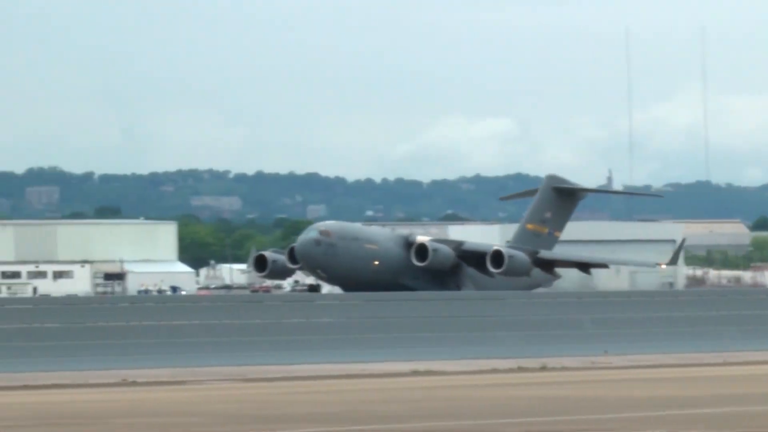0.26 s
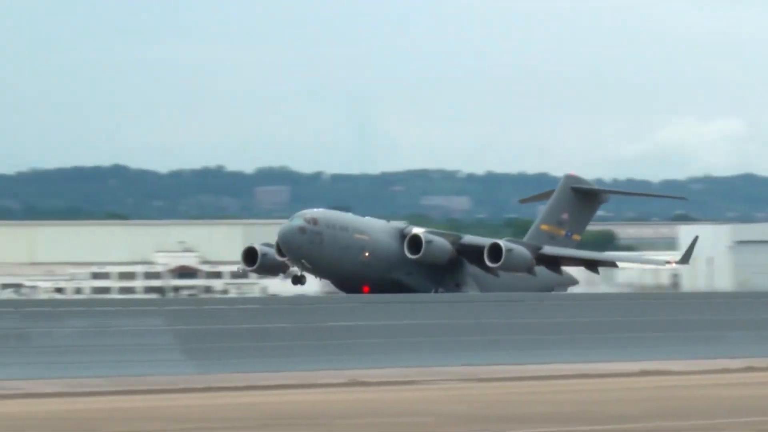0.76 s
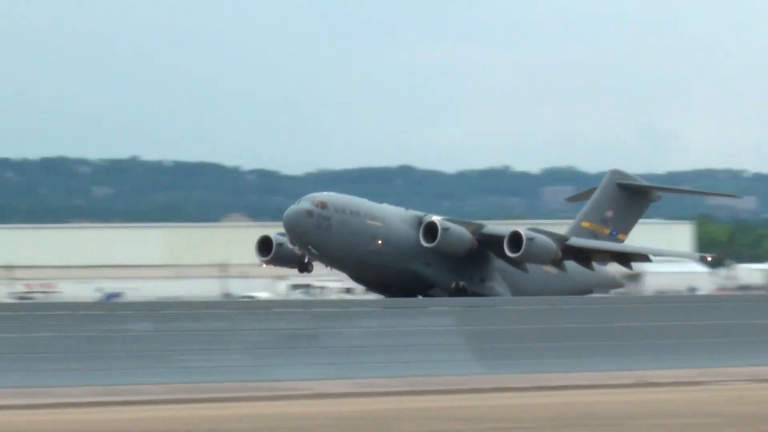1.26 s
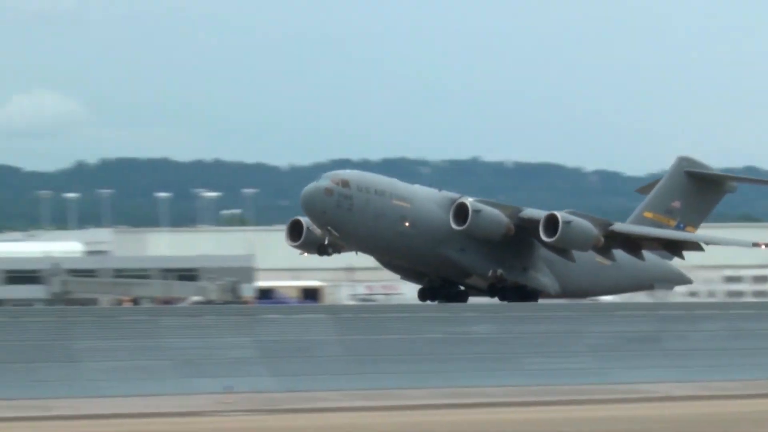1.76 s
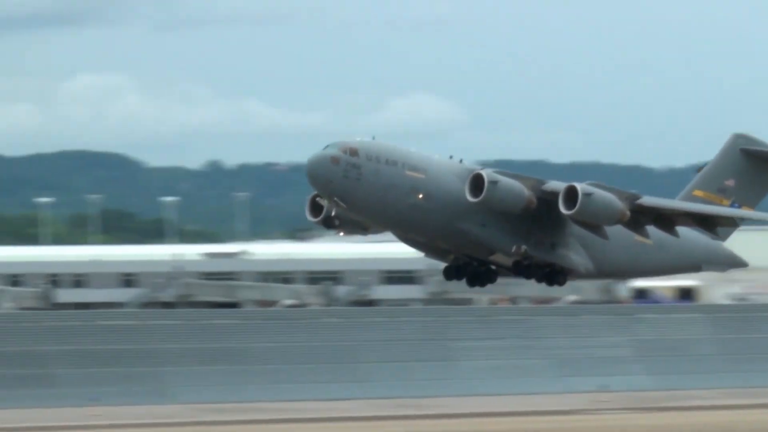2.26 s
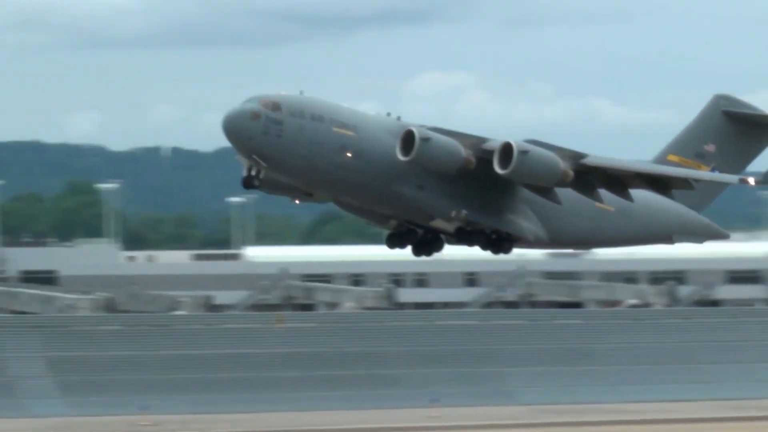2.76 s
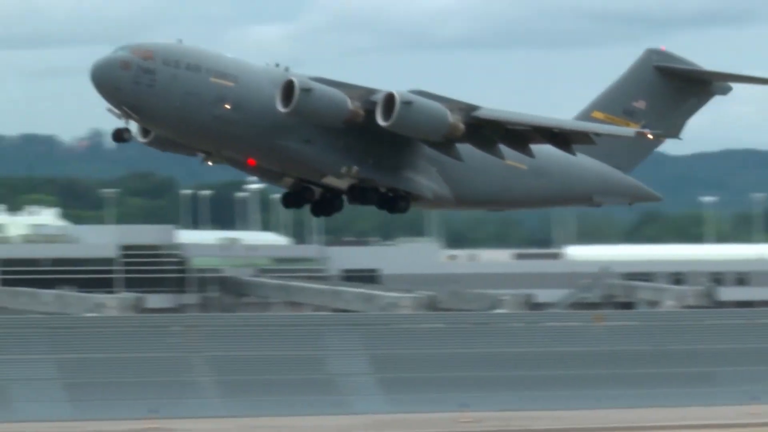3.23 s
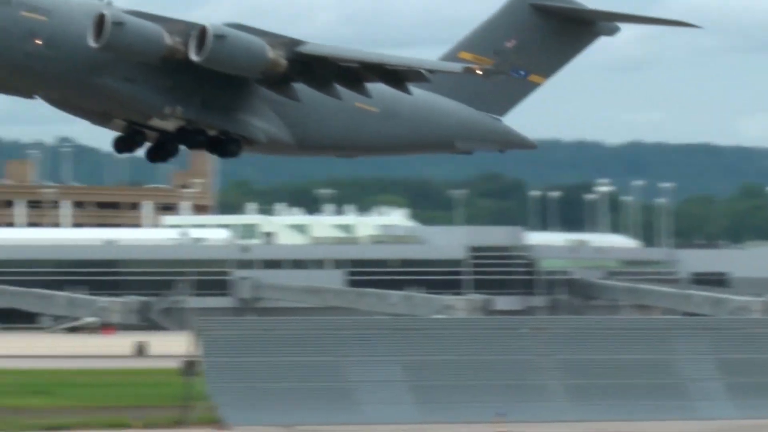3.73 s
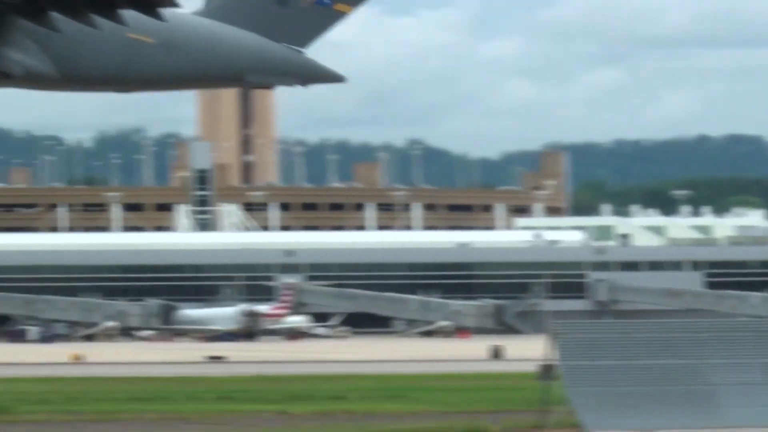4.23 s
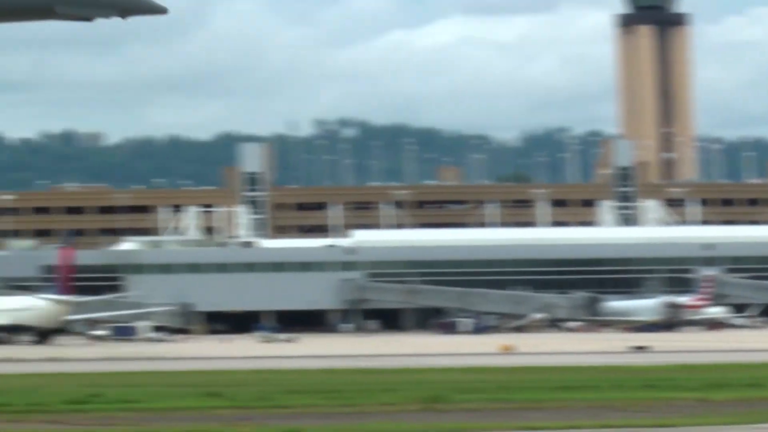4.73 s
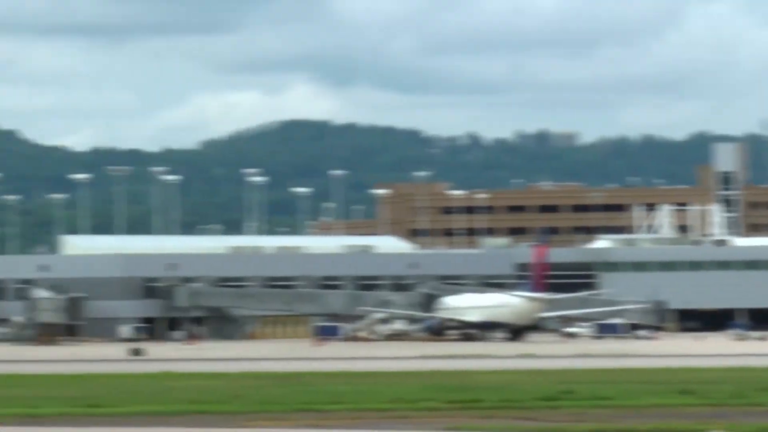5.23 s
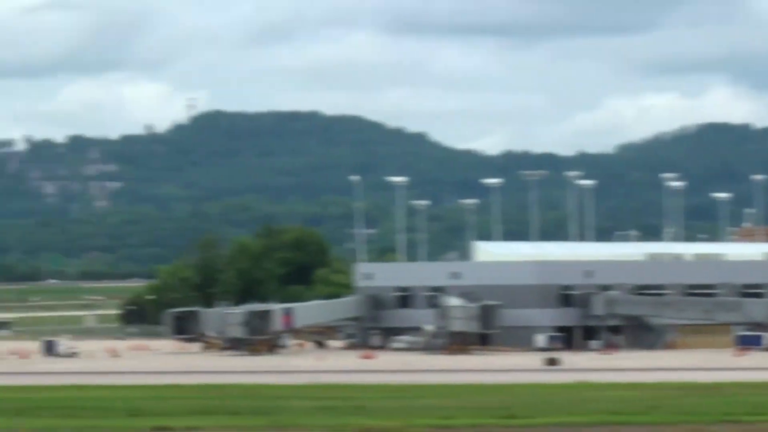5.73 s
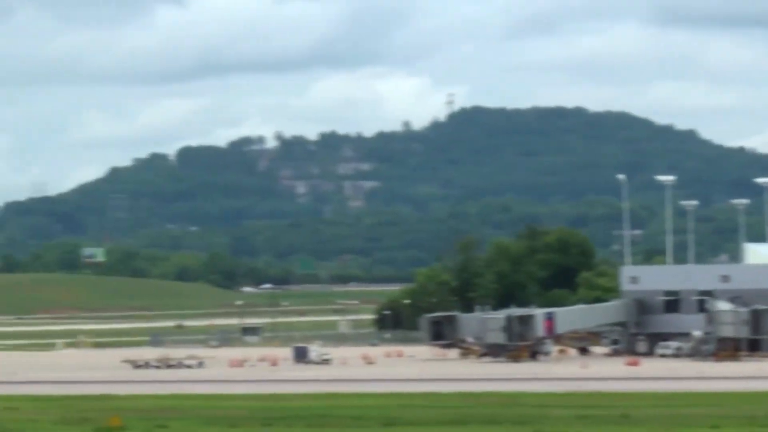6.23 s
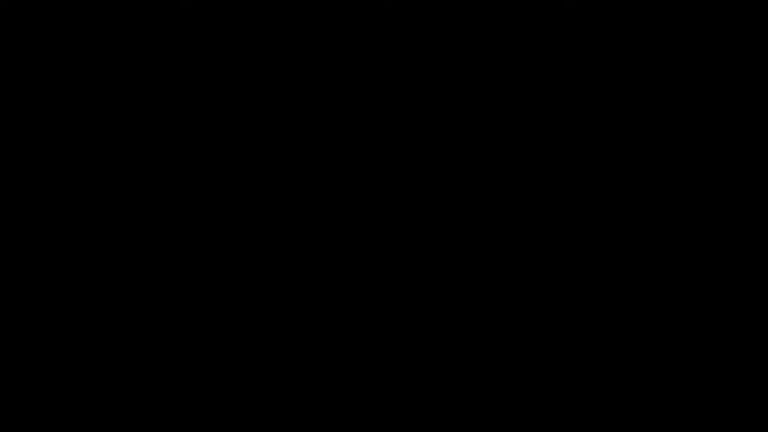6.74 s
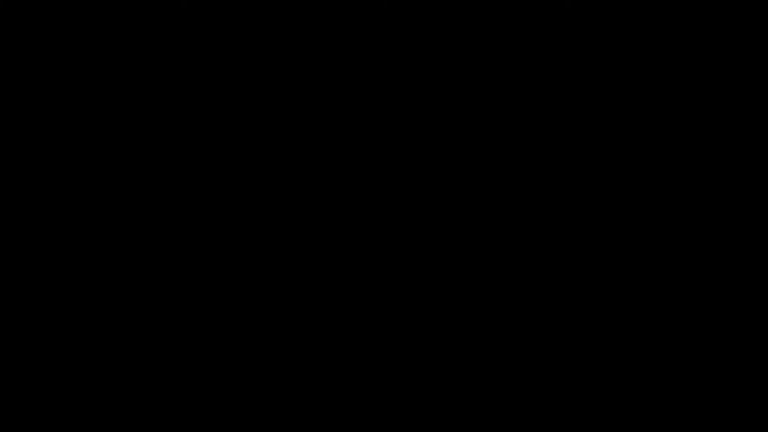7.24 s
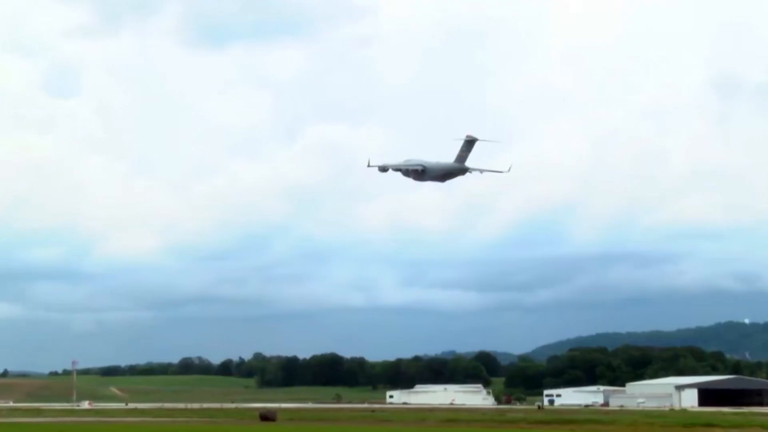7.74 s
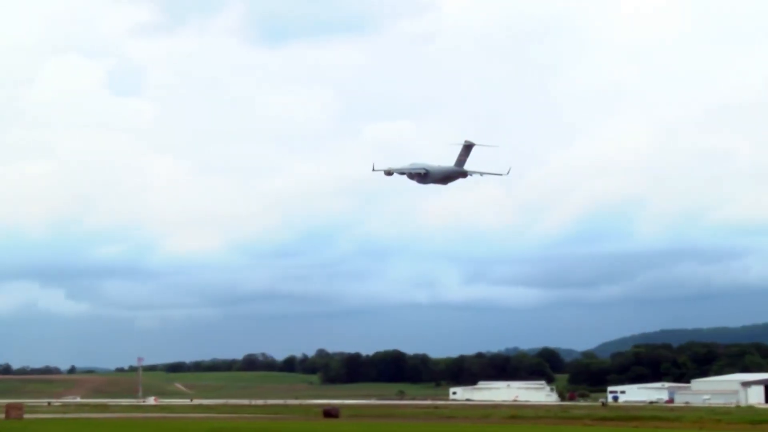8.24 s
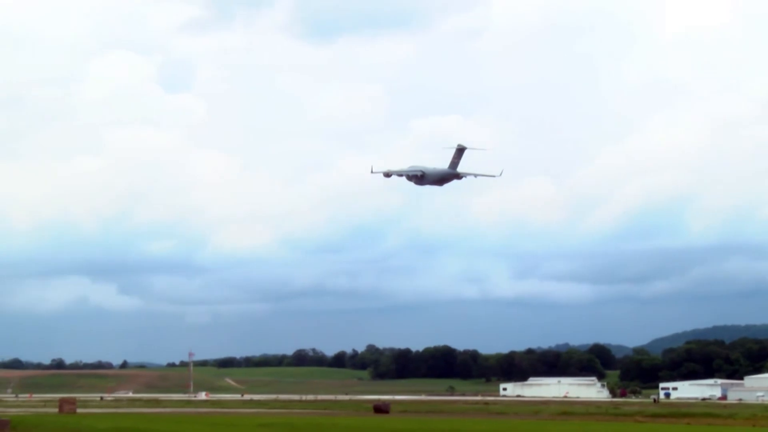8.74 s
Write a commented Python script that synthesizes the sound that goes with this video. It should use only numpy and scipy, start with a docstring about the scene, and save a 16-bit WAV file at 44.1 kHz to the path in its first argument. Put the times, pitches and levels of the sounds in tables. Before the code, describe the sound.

Rising jet takeoff with gusty fan rush, flaring whistles and swelling exhaust roar, an abrupt silent second, then a faint far-off climbing roar.

```python
"""An airfield, with one microphone some 190 m from the flight path of a four-engine cargo jet at full thrust.
The fans whine and buzz ahead of the jet: blade tones and shaft orders under a Doppler fall, over coloured noise.
Exhaust roar, low rumble and turbine hiss follow, each a noise coloured by a changing blend of spectra.
The sound is cut off; after a second of silence the jet is heard far away, climbing, as fading roar and fan tones."""
import sys
import numpy as np
from scipy import signal
from scipy.io import wavfile
from scipy.ndimage import uniform_filter1d

SR = 44100
rng = np.random.default_rng(int(sys.argv[2]) if len(sys.argv) > 2 else 0)


def unload_wav(signal):
    """Save mono or channel-first audio to the path in sys.argv[1] as 16-bit WAV at rate SR, clipped to [-1, 1]."""
    wavfile.write(
        sys.argv[1],
        SR,
        np.round(np.clip(np.atleast_2d(signal).T, -1, 1) * 32767).astype(np.int16),
    )


N = 396619  # length in samples

# Slow level of the fan rush and buzz at the microphone. Each row: time in seconds, level in dB.
FAN_LEVEL = [(0, -41.5), (0.9, -36), (1.7, -34.5), (2.1, -29), (3.4, -23.5), (4.0, -27), (4.5, -26),
             (5.4, -28.5), (6.2, -26), (6.78, -26)]
# Fan spectra, first, middle and last of the blend; only their shape counts.
# Each row: frequency in Hz, relative level in dB per Hz.
FAN_SPECTRUM_FIRST = [(950, -16), (1100, -5.5), (1350, -4), (1550, -6.5), (1680, -18.5), (1830, -5.5),
                      (2100, -2.5), (2350, -7), (2650, -2.5), (3050, -2.5), (3500, -9.5), (4200, -8.5),
                      (4650, -14.5), (5100, -25.5)]
FAN_SPECTRUM_MIDDLE = [(950, -8), (1100, -3), (1350, -4), (1550, -6), (1680, -10.5), (1830, -4), (2100, -3),
                       (2350, -3.5), (2650, -1), (3050, -3.5), (3500, -5), (4200, -4), (4650, -6),
                       (5100, -22.5)]
FAN_SPECTRUM_LAST = [(950, -6.5), (1100, 1), (1350, 3), (1550, -13), (1680, -11), (1830, -6), (2100, -1),
                     (2350, -6.5), (2650, -2.5), (3050, -7.5), (3500, -14), (4200, -8.5), (4650, -13),
                     (5100, -20.5)]


def fan_rush(buzz, level_shift_db):
    """Broadband rush of air through the fans, with the buzz-saw lines in it."""
    inlet_noise = rng.standard_normal(N)
    spectra = [FAN_SPECTRUM_FIRST, FAN_SPECTRUM_MIDDLE, FAN_SPECTRUM_LAST]
    return amp(curve(FAN_LEVEL) + level_shift_db) * radiate(inlet_noise + buzz, spectra, patchy_db=1.56)


# Strength of the buzz-saw lines against the white rush, before colouring.
# Each row: time in seconds, level in dB.
BUZZ_STRENGTH = [(0, -9.5), (2, -10.5), (3.4, -7.5), (3.9, -14), (4.6, -8.5), (5.2, -16), (5.8, -16.5),
                 (6.78, -21)]
# Strength of each multiple of the shaft speed, from the 5th up. Each entry: relative level in dB.
SHAFT_ORDER_LEVELS = [-4, -1, -1, -8.5, 3, -1.5, -12.5, -2, -1, 0, -4, -2.5, 0, -2, -10.5, -13.5, -11.5, 2,
                      -1.5, -2, 3, -1.5, 3, -0.5, -1.5, 3, 0, 3.5, 1.5, -2, 1.5, -11, 4, -1.5, -2, -0.5,
                      -8.5, -2.5, -3.5, -6.5]


def buzz_saw(detune=.0022, drift=.0016, count=3):
    """Uneven blade shocks repeat once a turn: stacks of shaft orders, a little apart from engine to engine."""
    orders = 5 + np.arange(len(SHAFT_ORDER_LEVELS))
    turn = np.linspace(0, 1, 2049)
    shaft_hz = blade_pitch() / BLADES
    stacks = np.zeros(N)
    for offset in np.linspace(-1, 1, count):
        phases = rng.random((len(orders), 1))
        shocks = amp(SHAFT_ORDER_LEVELS) @ np.cos(2 * np.pi * (orders[:, None] * turn + phases))
        speed_hz = shaft_hz * (1 + detune * offset + drift * wander(10.5).real)
        position = np.cumsum(speed_hz) / SR % 1
        stacks += np.interp(position, turn, shocks) * amp(2.5 * wander(7).real)
    return amp(curve(BUZZ_STRENGTH)) * evened(stacks)


# Slow level of the nearest blade tone, before its flares. Each row: time in seconds, level in dB.
WHINE_LEVEL = [(0, -51), (0.4, -44.5), (1.8, -45), (2.3, -39.5), (3.4, -34), (4.1, -41), (4.5, -28),
               (5.0, -29), (5.35, -35.5), (6.1, -32.5), (6.78, -45)]
# Tones that each beam at the microphone for a while. Each row: multiple of the shaft speed, width in Hz,
# scatter from 0 to 1, centre in seconds, length in seconds, peak level in dB.
BEAMING_TONES = [(4.98, 26, .5, 5.4, .5, -39.5), (9, 13, .4, .2, .9, -56), (16.1, 18, .5, 3.55, .5, -41),
                 (17.1, 30, .6, 2.25, .35, -40.5), (17.9, 50, .6, 1.98, 0.27, -38.5),
                 (25, 24, 0.3, 1.45, .8, -46.5), (41, 70, .6, 3.55, 0.56, -42.5),
                 (41.3, 60, .35, 4.75, 0.64, -33.5), (41.5, 60, .35, 5.47, .5, -40),
                 (72.4, 190, 0.98, 2.2, 3.6, -57)]
# Blade tone of the three farther engines: level at first, and gain by the closest point
OTHERS_DB, OTHERS_RISE_DB = -51.5, 9.5


def whistles():
    """The blade tone and beams at multiples of the shaft speed, all sinking together as the jet goes by."""
    t, blade_hz = np.arange(N) / SR, blade_pitch()
    # turbulence smears the blade tone most at 3.3 s and least at 4.5 s
    smear = curve([(0, 0.3), (3.3, 0.5), (4.5, 0.15), (6.78, .25)])
    halo_db = curve([(0, -2), (3.4, -3), (4.5, -14), (6.78, -8)])
    halo = amp(halo_db) * tone(blade_hz, 190)
    nearest = amp(curve(WHINE_LEVEL) + flares()) * (tone(blade_hz, 36, smear) + halo)
    # the other engines carry the tone through the fades of the nearest
    others = amp(OTHERS_DB + OTHERS_RISE_DB * t / CLOSEST_S) * tone(blade_hz, 44, scatter=0.82)
    beams = np.zeros(N)
    for multiple, width_hz, scatter, at_s, length_s, db in BEAMING_TONES:
        beam = tone(multiple * blade_hz / BLADES, width_hz, scatter)
        beams += amp(db) * bump(at_s, length_s) * beam
    return nearest + others + beams


# Moments when the blade tone flares. Each row: centre in seconds, length in seconds, lift in dB.
TONE_FLARES = [(.64, 0.08, 7), (0.946, 0.084, 6.5), (2.17, 0.1, 15), (2.31, 0.1, 11), (2.848, .08, 12.5),
               (3.23, 0.042, 6), (3.435, .11, 12.5), (4.28, .09, 10), (4.59, 0.16, 6.5), (4.808, 0.065, 8),
               (5.166, 0.17, 10), (5.444, .08, 6), (5.597, .1, 9), (5.796, .09, 6.5), (5.99, 0.075, 10),
               (6.217, .12, 9), (7.98, .08, 6), (8.107, .06, 8.5), (8.588, .12, 5), (8.97, 0.071, 4)]


def flares():
    """Decibels that the flares add to the blade tone, near and far."""
    return sum(db * bump(at_s, length_s) for at_s, length_s, db in TONE_FLARES)


BLADES = 36
BLADE_HZ, MACH = 2500.6, .1941  # unshifted blade tone; speed over that of sound
CLOSEST_S, PASS_S = 6.159, 2.849  # time of closest approach; closest distance over speed


def blade_pitch():
    """The blade-passing tone in Hz under the Doppler shift of a straight fly-by."""
    since = np.arange(N) / SR - CLOSEST_S
    return BLADE_HZ / (1 + MACH * since / np.hypot(since, PASS_S))


# Slow level of the exhaust roar at the microphone. Each row: time in seconds, level in dB.
ROAR_LEVEL = [(0.0, -51.5), (1.89, -45), (2.21, -39.5), (2.66, -40.5), (3.76, -33.5), (4.98, -34.5),
              (5.78, -38), (6.44, -37), (6.7, -35), (6.78, -33.5)]
# Roar spectra, first, middle and last of the blend. Each row: frequency in Hz, relative level in dB per Hz.
ROAR_SPECTRUM_FIRST = [(200, -9), (250, -10.5), (320, -4), (380, -6), (440, -4), (570, -2), (650, -2),
                       (710, -10.5), (790, 1), (900, -8.5), (950, -6.5)]
ROAR_SPECTRUM_MIDDLE = [(200, -4), (255, -4.5), (310, 2.5), (385, 5.5), (430, -6.5), (600, 1), (710, -11),
                        (800, -0.5), (885, -8.5), (950, -5.5)]
ROAR_SPECTRUM_LAST = [(200, -3.5), (255, -4.5), (360, 2.5), (450, -1.5), (610, -3), (720, -4.5),
                      (810, -3.5), (870, -2), (950, -3.5)]


def exhaust_roar(buzz, level_shift_db):
    """Jet-mixing noise between the rumble and the fan, with some of the buzz in it."""
    jet_noise = rng.standard_normal(N)
    spectra = [ROAR_SPECTRUM_FIRST, ROAR_SPECTRUM_MIDDLE, ROAR_SPECTRUM_LAST]
    return amp(curve(ROAR_LEVEL) + level_shift_db) * radiate(jet_noise + .6 * buzz, spectra, patchy_db=1.0)


# Slow level of the turbine hiss at the microphone. Each row: time in seconds, level in dB.
HISS_LEVEL = [(0, -66.5), (1.5, -55.5), (2.1, -47), (4.1, -40.5), (5.5, -36), (6.15, -30), (6.78, -32.5)]
# Hiss spectra, first, middle and last of the blend. Each row: frequency in Hz, relative level in dB per Hz.
HISS_SPECTRUM_FIRST = [(5100, -1), (5650, -2), (6050, 3), (6600, -2), (7150, -0.5), (7900, -15),
                       (9100, -17), (10300, -31.5), (11300, -29.5), (12200, -36.5), (15000, -47)]
HISS_SPECTRUM_MIDDLE = [(5100, -12), (5700, -10.5), (6100, -2), (6500, 0.5), (7000, 3), (7750, -9),
                        (9100, -11), (10400, -23), (10900, -21), (11600, -24), (12100, -35), (15000, -44)]
HISS_SPECTRUM_LAST = [(5100, -21.5), (5650, -5), (6100, 2.5), (7050, -1.5), (7900, -14.5), (9150, -18),
                      (10400, -29.5), (10900, -25.5), (12000, -32.5), (12700, -33), (13400, -43),
                      (15000, -46.5)]


def turbine_hiss(level_shift_db):
    """Turbine noise, the treble above the fan."""
    turbine_noise = rng.standard_normal(N)
    spectra = [HISS_SPECTRUM_FIRST, HISS_SPECTRUM_MIDDLE, HISS_SPECTRUM_LAST]
    return amp(curve(HISS_LEVEL) + level_shift_db) * radiate(turbine_noise, spectra, patchy_db=1.0)


# Slow level of the low rumble at the microphone. Each row: time in seconds, level in dB.
RUMBLE_LEVEL = [(0.0, -49), (0.7, -49.5), (1.81, -46), (3.47, -48.5), (4.1, -43.5), (4.65, -47),
                (6.14, -42.5), (6.78, -47.5)]
# Rumble spectra, first of the blend, then middle and last alike.
# Each row: frequency in Hz, relative level in dB per Hz.
RUMBLE_SPECTRUM_FIRST = [(25, -27), (38, -22.5), (50, -10), (72, 6.5), (100, -1), (150, -6), (200, -7.5)]
RUMBLE_SPECTRUM_LATER = [(25, -24), (38, -19.5), (50, -16.5), (72, -1.5), (100, -1), (150, -2), (200, 4.5)]


def wake_rumble():
    """The lowest noise, from the wake; the gusts leave it alone."""
    wake_noise = rng.standard_normal(N)
    spectra = [RUMBLE_SPECTRUM_FIRST, RUMBLE_SPECTRUM_LATER, RUMBLE_SPECTRUM_LATER]
    return amp(curve(RUMBLE_LEVEL)) * radiate(wake_noise, spectra, patchy_db=1.1)


# Gusts that carry the sound to the microphone, or away. Each row: centre in seconds, length in seconds,
# change of the fan rush in dB, change of the hiss in dB.
GUST_SWELLS = [(1.743, .08, -2.5, 0), (1.842, 0.071, 4, 1), (1.962, 0.045, 3, 2), (2.127, 0.15, 5, 2.5),
               (2.27, 0.14, 7, 2.5), (2.524, 0.057, -3.5, -4), (2.63, 0.065, -6.5, -4),
               (2.779, 0.11, 1.5, 4), (2.86, .07, 4.5, 2.5), (2.975, 0.067, 4.5, 2), (3.05, .11, -3, -4.5),
               (3.28, .05, -3.5, -1.5), (3.33, .05, 3, 1.5), (3.44, 0.12, 2, 6.5), (3.545, .08, 3.5, 4),
               (3.94, .09, -3, -2), (4.9, .06, 3, 0), (5.07, .18, -2, 0), (6.2, .1, 1.5, 2),
               (6.425, 0.072, 1.5, 7), (6.694, .13, 4, 7.5), (8.07, .12, 2, 0), (8.93, 0.22, 4, 0)]


def swells():
    """Decibels that the gusts add to the fan rush and to the hiss."""
    return sum(np.outer([fan_db, hiss_db], bump(at_s, length_s))
               for at_s, length_s, fan_db, hiss_db in GUST_SWELLS)


ROAR_SWAY = .2  # share of the fan's swells that the exhaust roar follows


def passing():
    """The close pass: fan, tones, roar and hiss shaken by the same gusts, over the rumble."""
    gust = evened(wander(24).real)
    fan_swell, hiss_swell = swells()
    buzz = buzz_saw()
    fan = fan_rush(buzz, fan_swell + .8 * gust)
    tones = amp(0.94 * gust) * whistles()
    roar = exhaust_roar(buzz, ROAR_SWAY * fan_swell + 0.77 * gust)
    hiss = turbine_hiss(hiss_swell + 1.3 * gust)
    return fan + tones + roar + hiss + wake_rumble()


# Spectra of the far-off roar and fan rush. Each row: frequency in Hz, relative level in dB per Hz.
FAR_ROAR_SPECTRUM = [(25, -22), (45, -7), (75, -1), (130, -0.5), (205, 1.5), (320, -3.5), (470, -7.5),
                     (630, -0.5), (740, -4), (830, 0.5), (1150, -6.5), (1500, -5.5)]
FAR_RUSH_SPECTRUM = [(1500, -2.5), (2550, 1), (2850, -3), (3150, -1.5), (3450, -7), (4200, -1.5),
                     (4600, -5.5), (5000, -15), (5650, -24), (6100, -16.5), (7100, -18), (7800, -28),
                     (9100, -33), (10300, -44), (15000, -55)]
# Fluttering, blurred tones of the far-off jet, without a slow change of level.
# Each row: frequency in Hz, width in Hz, level in dB.
FAR_BLURRED_TONES = [(2010, 18, -63), (3090, 40, -63), (6000, 60, -77)]
CUT_S, RESUME_S = 6.786, 7.787  # end of the close pass; start of the distant climb
FAR_ROAR_DB, FAR_RUSH_DB, FAR_WHINE_DB = -42.2, -42.5, -54  # roar and rush as the sound resumes; whine
ROAR_FADE_DB_PER_S, RUSH_FADE_DB_PER_S = 2.2, 4.5


def climbing():
    """Far off, the air has taken the treble; the roar fades steadily and the whine comes and goes."""
    jet_noise, inlet_noise = rng.standard_normal((2, N))
    since = np.maximum(np.arange(N) / SR - RESUME_S, 0)
    fan_swell = swells()[0]
    roar_db = FAR_ROAR_DB - ROAR_FADE_DB_PER_S * since + ROAR_SWAY * fan_swell
    roar = amp(roar_db) * radiate(jet_noise, [FAR_ROAR_SPECTRUM], patchy_db=-0.1)
    rush_db = FAR_RUSH_DB - RUSH_FADE_DB_PER_S * since + fan_swell + .6 * wander(20).real
    rush = amp(rush_db) * radiate(inlet_noise, [FAR_RUSH_SPECTRUM], patchy_db=1.5)
    whine_hz = curve([(7.8, 4006), (8.5, 3975), (9, 3960)])
    whine = amp(FAR_WHINE_DB + flares()) * tone(whine_hz, 110, scatter=0.65)
    blurred = sum(amp(db) * tone(hz, width_hz) for hz, width_hz, db in FAR_BLURRED_TONES)
    return roar + rush + whine + blurred


# Which spectrum colours the sound. Each row: time in seconds,
# place in the blend (0 the first spectrum, 1 the middle, 2 and over the last).
SPECTRUM_BLEND = [(0, 0.28), (3.2, 0), (4.3, 1.22), (5.2, 0.42), (6.15, 2.1), (6.78, 2.5)]


def radiate(source, spectra, patchy_db):
    """Colours a white source by the blend; eddies on the path lift and sink patches of the spectrum."""
    hz, t, z = signal.stft(source, SR, nperseg=2048, noverlap=1536)
    last = len(spectra) - 1
    place = np.clip(np.interp(t, *np.transpose(SPECTRUM_BLEND)) / 2 * last, 0, last)
    db = 0
    for k, spectrum in enumerate(spectra):
        nearness = np.maximum(1 - abs(place - k), 0)
        db = db + band(spectrum, hz)[:, None] * nearness
    patches = uniform_filter1d(rng.standard_normal(z.shape), size=20, axis=0)  # across frequency
    patches = uniform_filter1d(patches, size=7, axis=1)  # across time
    gain = amp(db + patchy_db * evened(patches))
    sound = signal.istft(z * gain, SR, nperseg=2048, noverlap=1536)[1][:N]
    # the running level is held at rms 1, so the spectra do not change the loudness
    return sound / np.sqrt(uniform_filter1d(sound ** 2, size=9000) + 1e-20)


def band(points, hz, skirt_db=70):
    """A spectrum in dB that falls by skirt_db an octave beyond its ends."""
    f, db = np.transpose(points)
    octave, known = np.log2(hz + 1), np.log2(f)
    beyond = abs(octave - np.clip(octave, known[0], known[-1]))
    return np.interp(octave, known, db) - skirt_db * beyond


def tone(hz, width_hz, scatter=1):
    """A line of rms 1; turbulence scatters a share of it into a narrow hump."""
    share = np.clip(scatter, 0, 1)
    fading = np.sqrt(1 - share) + np.sqrt(share) * wander(width_hz / 2)
    carrier = np.exp(2j * np.pi * np.cumsum(hz * np.ones(N)) / SR)
    return evened((fading * carrier).real)


def wander(rate_hz):
    """Smooth complex chance of rms 1 with motion up to about rate_hz."""
    size = N // 64 + 2  # drawn at a 64th of the sample rate
    hz = np.fft.fftfreq(size, 64 / SR)
    a, b = rng.standard_normal((2, size))
    slow = np.fft.ifft((a + 1j * b) / np.sqrt(1 + (hz / rate_hz) ** 4))
    return evened(np.interp(np.arange(N), np.linspace(0, N, size), slow))


def bump(at_s, length_s):
    """A smooth rise and fall of height 1."""
    return np.exp(-np.minimum((2 * (np.arange(N) / SR - at_s) / length_s) ** 2, 50))


def curve(rows):
    """Rows (s, value) joined by straight lines, one value a sample."""
    return np.interp(np.arange(N) / SR, *np.transpose(rows))


def amp(db):
    """Decibels to gain."""
    return 10 ** (np.asarray(db) / 20)


def evened(x):
    """Scales to rms 1."""
    return x / np.sqrt(np.mean(abs(x) ** 2) + 1e-20)


def scene():
    """The close pass, a hard cut to silence, then the distant climb."""
    t = np.arange(N) / SR
    remnant = (t >= CUT_S) & (t < CUT_S + .008)  # a faint 8 ms just after the cut
    near_gate = (t < CUT_S) + amp(-17.5) * remnant
    far_gate = t >= RESUME_S
    return (passing() * near_gate + climbing() * far_gate)[None]


EDGE_HZ = 15050  # upper limit of the band


def record(dry, knee=.21, headroom=.26):
    """At the microphone the highest peaks are rounded off; then the treble ends at the band limit."""
    over = np.maximum(abs(dry) - knee, 0)
    rounded = dry - np.sign(dry) * (over - headroom * np.tanh(over / headroom))
    lowpass = signal.firwin(511, EDGE_HZ, window=("kaiser", 9), fs=SR)
    return signal.oaconvolve(rounded, lowpass[None], "same")


dry = scene()
out = record(dry)
unload_wav(out)
```